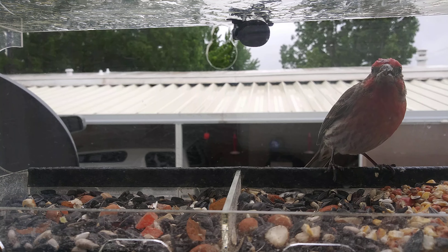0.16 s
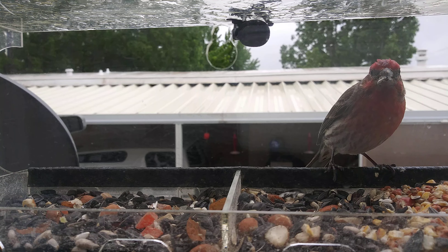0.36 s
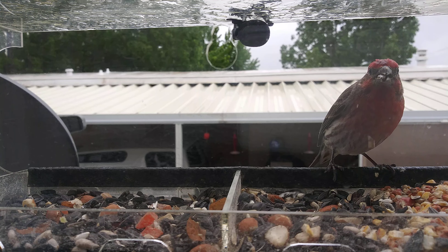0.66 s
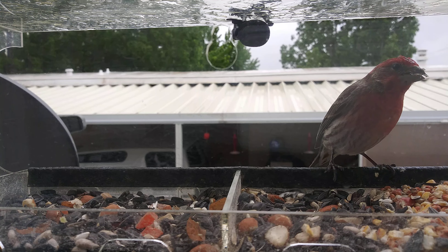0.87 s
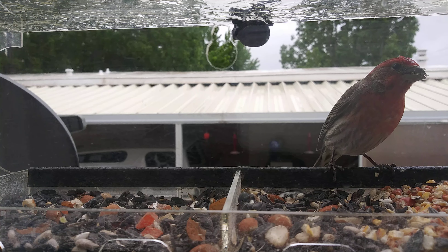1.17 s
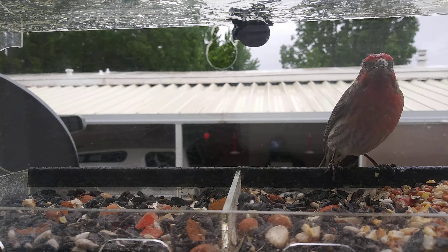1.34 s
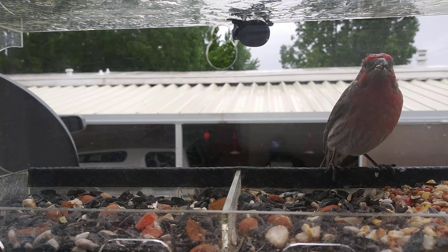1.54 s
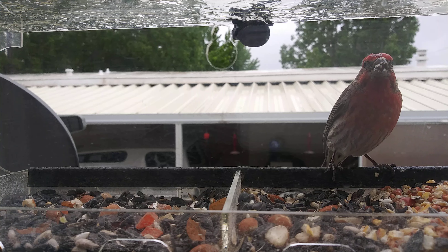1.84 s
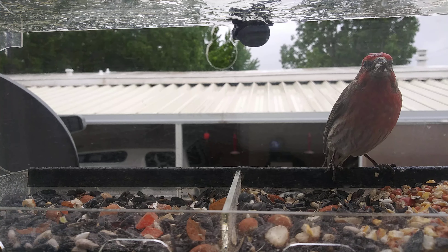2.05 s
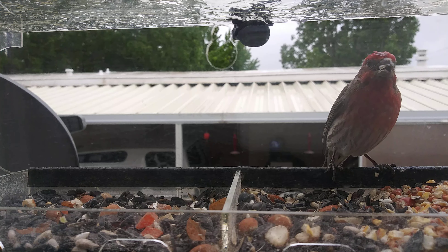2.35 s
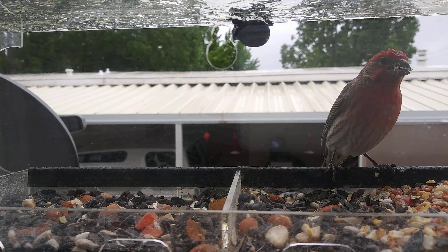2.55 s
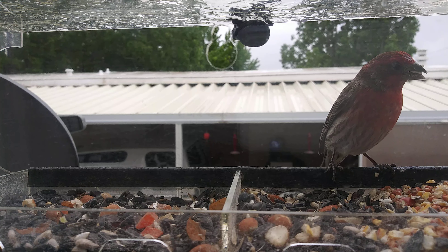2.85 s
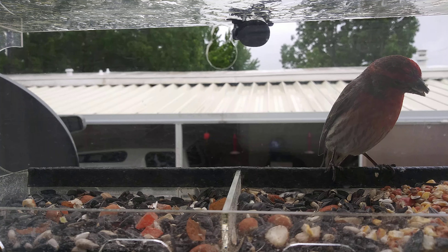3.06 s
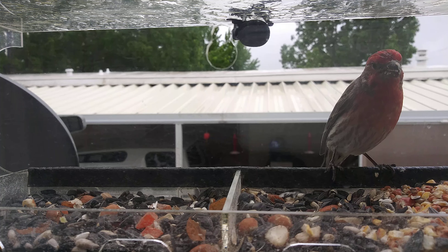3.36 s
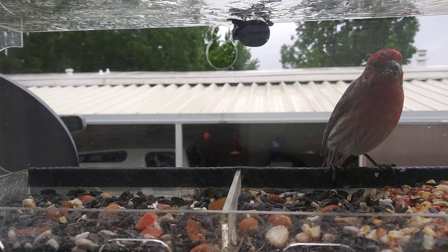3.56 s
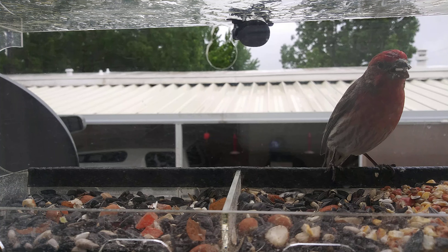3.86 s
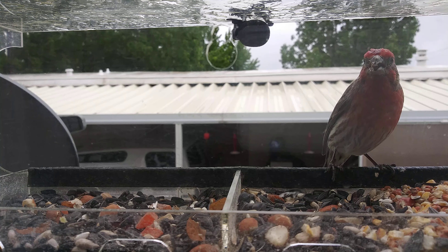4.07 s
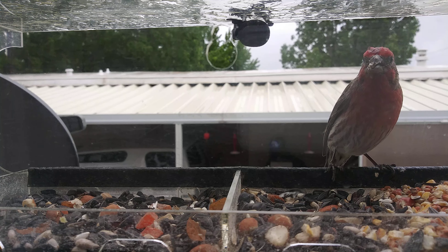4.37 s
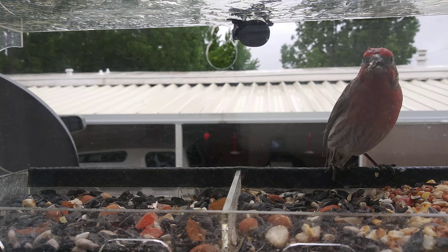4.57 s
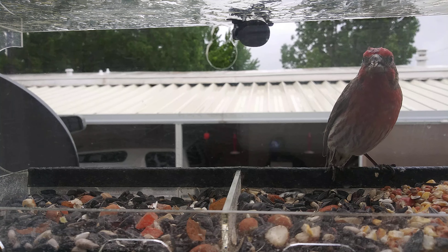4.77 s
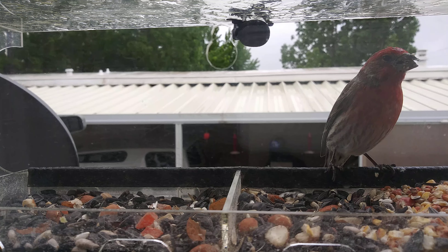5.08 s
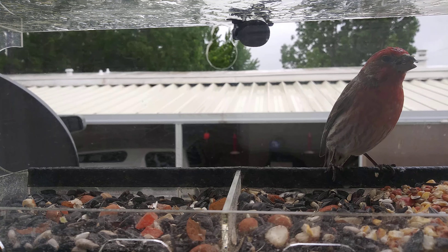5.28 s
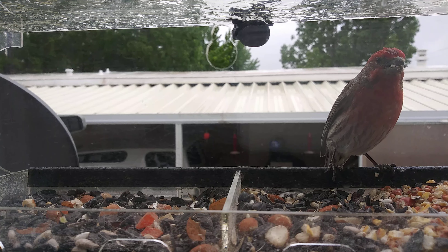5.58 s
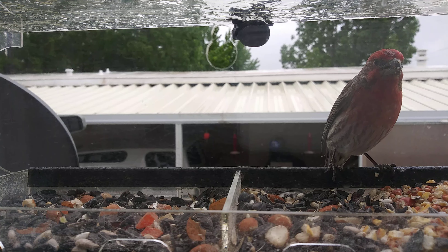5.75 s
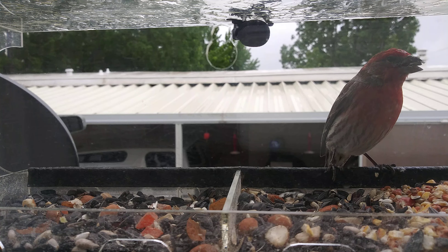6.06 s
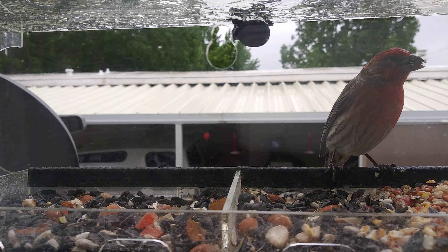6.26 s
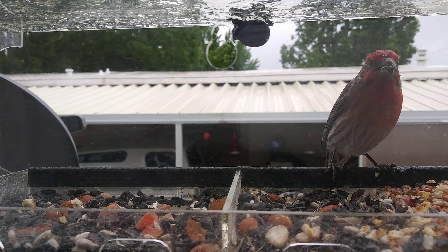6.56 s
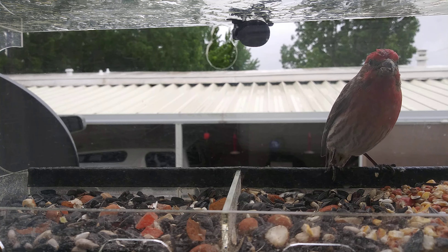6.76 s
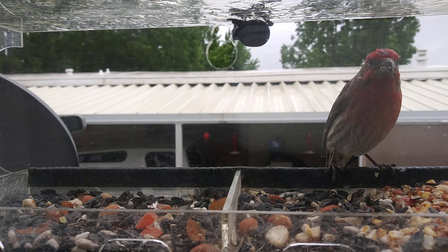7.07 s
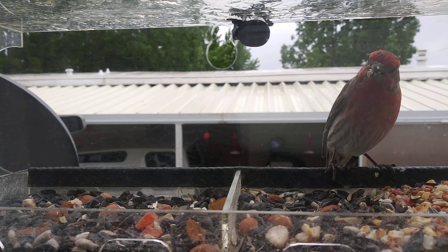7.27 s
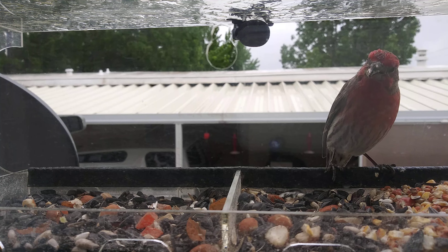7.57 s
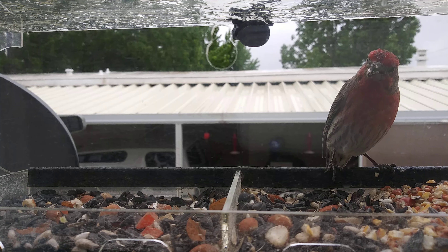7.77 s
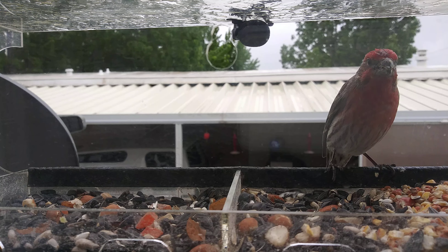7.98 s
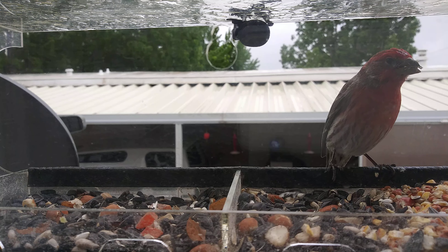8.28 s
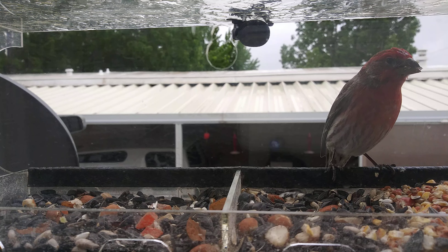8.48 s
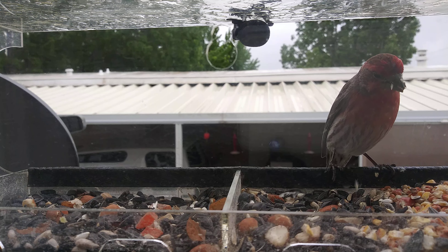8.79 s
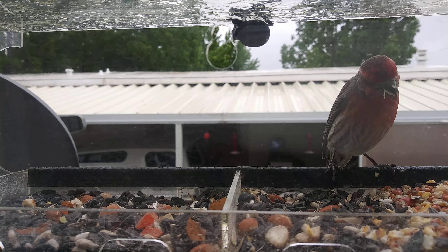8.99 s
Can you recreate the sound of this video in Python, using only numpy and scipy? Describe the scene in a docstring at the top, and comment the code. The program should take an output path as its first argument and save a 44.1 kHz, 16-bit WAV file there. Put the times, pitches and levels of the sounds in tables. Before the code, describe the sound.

Outdoors on a drizzly day, a finch husks seeds right beside a microphone in a plastic feeder. Brittle snaps of very uneven strength come irregularly, with faint crunchy ticks between. Behind, cars hum past on a far wet road, mostly in the first three seconds, water drips plink softly, and low thumps surface. A short raspy chirp falls near 3.4 seconds, another fainter near 7.3; the hardest crack comes near 8.6.

```python
"""A feeder on a drizzly day: a finch cracks and husks seeds in the plastic, right beside the feeder's camera.
Cracks are snaps of noise through ringing plastic modes; two chirps and faint whistles are gliding tones.
Far drips are decaying tones; cars on a distant wet road, soft low thumps and drizzle are shaped noise.
The camera's noise suppressor holds steady treble hiss down and lets it through briefly around each tick."""
import sys
import numpy as np
from scipy import signal
from scipy.fft import rfft, irfft, next_fast_len
from scipy.io import wavfile
from scipy.ndimage import uniform_filter1d, minimum_filter1d

SR = 44100
rng = np.random.default_rng(int(sys.argv[2]) if len(sys.argv) > 2 else 0)


def master(y):
    """Save y as 16-bit WAV."""
    cut = np.clip(np.atleast_2d(y).T, -1, 1)
    pcm = np.round(cut * 32767)  # scale
    wavfile.write(sys.argv[1], SR, pcm.astype(np.int16))


N = 402633

# Low outdoor rumble. Each row: time in seconds, level in dB before rumble_gain_db.
RUMBLE_LEVEL = [(0.0, -63), (0.64, -61), (0.99, -53.5), (2.26, -62), (4.78, -62.5), (5.08, -67),
                (5.95, -61.5), (6.53, -63.5), (6.79, -58), (7.12, -60), (7.55, -64.5), (7.93, -63.5),
                (9.13, -65.5)]
# Noise spectra. Each row: frequency in Hz, relative density in dB per Hz.
RUMBLE_SPECTRUM = [(20, -36), (45, -16), (100, -5), (180, -1), (370, -1), (480, -9.5), (720, -11),
                   (1100, -32.5), (2500, -53.5)]
DRONE_SPECTRUM = [(300, -48), (440, -12.5), (535, -5), (580, -5.5), (630, -6.5), (700, -12.5), (850, -53)]
ROAR_SPECTRUM = [(600, -48), (770, -13.5), (860, -1.5), (950, 0), (1040, -4), (1130, -13), (1450, -57.5)]
WHINE_SPECTRUM = [(950, -37), (1130, 2.5), (1230, 6.5), (1340, 6), (1490, -11), (1700, -3.5), (2050, -9),
                  (2350, -6), (2650, -11.5), (4000, -39.5)]
SPRAY_SPECTRUM = [(1200, -22.5), (1600, -6), (2300, -2), (2800, -13), (4200, -2.5), (5400, -1.5),
                  (6500, -12.5), (9000, -24)]
DRIZZLE_SPECTRUM = [(700, -28.5), (1450, -6.5), (1700, -2.5), (2100, -2.5), (2450, 6), (2800, 1),
                    (3300, -0.5), (4200, 2), (6200, -2.5), (9500, -5.5), (12500, -12), (16000, -11)]
# Cars on the far road. Each row: nearest at in seconds, half length in seconds,
# then tyre roar, engine drone, tyre whine and spray in dB before the band gains.
CAR_PASSES = [(0.165, 0.76, -42, -44.5, -45, -66), (0.8, 0.16, -59.5, -51.5, -49.5, -59),
              (1.154, 0.45, -72, -45.5, -51, -67), (1.477, 0.55, -39, -47.5, -54, -57.5),
              (2.25, 0.25, -41.5, -45.5, -57.5, -60), (2.541, 0.3, -44, -49, -54, -60.5),
              (3.184, 0.72, -51, -59, -78, -63.5), (4.395, 0.068, -57, -84.5, -75, -77),
              (7.003, 0.18, -86.5, -49, -75, -79), (8.001, 0.29, -37.5, -43.5, -55.5, -68),
              (8.907, 0.6, -46.5, -68, -61, -74.5)]
# Steady road: roar, drone, whine and spray in dB before the band gains.
STEADY_ROAD_DB = (-78, -65.5, -76.5, -91.5)
# Exponents of the fade with distance: roar, drone, whine and spray.
FADE_EXPONENTS = (3.23, 6.8, 4.1, 0.77)
# Drips that ring on gutters and pots. Each row: start in seconds, pitch in Hz, level in dB before drip_gain_db.
RINGING_DRIPS = [(.26, 503, -46), (.41, 638, -49), (.78, 656, -48), (0.889, 400, -47), (1.09, 303, -47.5),
                 (1.17, 606, -44), (1.53, 561, -42), (1.748, 350, -50.5), (1.76, 560, -46.5),
                 (2.13, 577, -46), (2.22, 571, -49), (2.48, 555, -50.5), (2.511, 373.4, -47),
                 (3.2, 603, -57), (3.519, 363, -53), (3.81, 613, -56), (3.89, 350, -55.5),
                 (4.05, 581, -49.5), (4.205, 3240, -62), (4.3, 595, -57), (5.471, 384, -54.5),
                 (5.61, 618, -56), (5.839, 357, -52), (5.85, 1320, -63), (6.1, 377, -56), (6.149, 328, -52),
                 (6.59, 1670, -59), (6.659, 1800, -59.5), (6.905, 563, -47), (6.981, 496, -51),
                 (6.993, 1673, -52.5), (7.07, 541, -46), (7.25, 527, -49.5), (7.385, 1644, -62),
                 (7.91, 547, -42), (7.99, 523, -45)]
# Usual level of the fainter drips. Each row: pitch in Hz, level in dB before scatter.
FAINT_DRIP_LEVEL = [(280, -65.5), (600, -65), (1000, -64), (1700, -64.5), (2100, -68)]
# Soft thumps. Each row: middle in seconds, half-height length in seconds, pitch in Hz,
# level in dB before thump_gain_db.
LOW_THUMPS = [(.95, 0.12, 153, -53), (1.15, 0.13, 160, -57), (1.547, 0.071, 309, -48.5),
              (1.764, 0.072, 222, -61.5), (2.035, 0.1, 201, -50.5), (4.388, 0.096, 184, -55),
              (4.639, 0.098, 180, -55), (6.61, 0.19, 110, -59.5), (6.795, 0.14, 139, -58.5),
              (7.25, 0.18, 167, -55.5)]
# Far birds. Each row: start in seconds, length in seconds, pitch in Hz, sag in Hz, level in dB.
FAR_WHISTLES = [(3.935, 0.18, 1850, 45, -57), (4.202, 0.079, 4600, 60, -65), (4.27, 0.11, 4590, 110, -70),
                (4.655, 0.14, 2819, 49.5, -59), (4.773, 0.13, 2430, 40.2, -59),
                (4.873, 0.083, 2580, 60, -57)]
# Two chirps, point by point. Each row: time in seconds, pitch in Hz, level in dB before the voice gain.
CHIRP_POINTS = [
    [(3.375, 4100, -64), (3.383, 4250, -45), (3.391, 4400, -55), (3.399, 4400, -49), (3.405, 4300, -41),
     (3.411, 4150, -34), (3.416, 4050, -37), (3.422, 3900, -29), (3.435, 3350, -33), (3.441, 3050, -47),
     (3.449, 2720, -39), (3.456, 2600, -64)],
    [(7.255, 3800, -66), (7.264, 3850, -55), (7.272, 4300, -54), (7.281, 4750, -56), (7.293, 4400, -42),
     (7.303, 4100, -47), (7.318, 3400, -44), (7.328, 2950, -51), (7.334, 2700, -70)],
]
# Voice of each chirp. Each row: gain in dB, overtone in dB, upper voice in dB, rasp depth in rad.
CHIRP_VOICES = [(-.5, -15, -10, .4), (-.5, -23, -10, .2)]
# Near walls that return the chirps. Each row: delay in seconds, level in dB.
WALL_ECHOES = [(.005, -8), (0.019, -11.5), (.037, -10)]
# Decay of the yard's echo. Each row: frequency in Hz, t60 in seconds.
YARD_T60 = [(300, 0.54), (4000, 0.33), (9000, 0.42), (16000, 0.78)]
# Modes of the plastic housing. Each row: frequency in Hz, t60 in seconds, level in dB over the direct sound.
HOUSING_MODES = [(980, .05, 1), (1670, .045, 5), (1800, .04, 1), (2035, .04, -2), (2780, .032, 8),
                 (3180, .028, 3), (4135, .02, -4), (5262, .026, 1), (5690, .022, -4), (6370, .03, 1),
                 (6700, .022, -5), (7495, .028, -7), (12720, .022, -4), (13720, .025, -5)]
# Colour shared by all cracks. Each row: frequency in Hz, level in dB.
SHELL_SPECTRUM = [(100, -51), (500, -40.5), (750, -31.5), (950, -7), (1400, -21), (1750, -6), (2450, -6.5),
                  (3300, 0), (4100, 4), (5500, -3), (7800, 1.5), (10900, 0.5), (12700, 1.5), (15200, -1),
                  (16500, -16)]
# Beak cracks. Each row: start in seconds, level in dB over 5 ms,
# then added tilt in dB at 2, 3.5 and 13 kHz against 7 kHz.
BEAK_CRACKS = [(0.049, -47.5, 3.5, 4, 7.5), (0.1215, -12.5, -4, -6, 1.5), (0.134, -46.5, -12, -9, 2.5),
               (0.3448, -46, -11.5, 0, 6.5), (0.6656, -21.5, -13, -2, -1), (0.6897, -41, 15, -2, -7),
               (0.7527, -51, 8, 7, 1.5), (0.791, -53, 1, -9, 6), (0.8093, -43, 12, 0.5, -10),
               (0.8504, -40, 23, 11.5, -1), (0.8954, -34.5, -13, -4, 4), (.899, -36.5, -14, -4, 0.5),
               (0.902, -46, -6, -4, -5), (0.954, -34, -29, -0.5, 0.5), (0.994, -48.5, -1, -14, -7.5),
               (1.036, -40.5, 12, -5.5, -10), (1.098, -55, -10, -12, -4), (1.1333, -41.5, 20, 13, -11),
               (1.234, -48, 4, 3.5, 0), (1.2996, -51.5, -1, -13, -2.5), (1.4434, -44, -10, -18, 7.5),
               (1.4513, -24, 4.5, -5.5, -11), (1.529, -42, 17, 2, 1), (1.671, -45.5, -2, -2.5, -2),
               (1.867, -23.5, -2.5, 2, -0.5), (1.943, -39, 19.5, 8, 9), (2.017, -50, -24, -6, -1),
               (2.071, -49.5, -13, -12, 0), (2.164, -47, 7, -15.5, -13), (2.3686, -46.5, 7.5, 2.5, 0),
               (2.585, -35.5, 0, -7, -0.5), (2.65, -55, -8, -13, 1), (2.7925, -42, -22, -4, -1),
               (2.829, -31.5, -28, 5.5, -10), (2.8952, -49, -2.5, -5, -10), (2.915, -44, -1, 6, -9),
               (2.9964, -41.5, -17, 11, -20), (3.0384, -32, -25, -5, 4), (3.0881, -20, -29.5, 4.5, -4.5),
               (3.096, -29, -4.5, 2, -3), (3.193, -48, -24, -2.5, -8), (3.2766, -42.5, -4, -10, 9.5),
               (3.545, -52.5, 1, -8, -19), (3.551, -44.5, 10.5, 8.5, -9.5), (3.654, -18.5, -8, 1, 2.5),
               (3.6641, -32, 1, -2, 4), (3.697, -28.5, 6.5, -0.5, 3.5), (3.836, -53.5, -7, 20, -10),
               (3.907, -48.5, 17, 8, -18), (4.0104, -45.5, -15, -10, 9.5), (4.047, -50.5, -4, -20, 6),
               (4.28, -51.5, 17.5, 4, -13), (4.3137, -52.5, -17, -24, -1), (4.3675, -50, 9.5, 4, -6),
               (4.5323, -25, 4, 4.5, -1), (4.607, -48, -4, 2, -18.5), (4.681, -39, -1, 1, -11),
               (4.833, -50.5, -1, 7.5, -21), (4.878, -54.5, 21.5, 6.5, -10), (4.9791, -45, -15.5, -12.5, 7),
               (5.0012, -50, -19, -21.5, -9.5), (5.2826, -16.5, 1, 7, -1.5), (5.3648, -44, 6.5, 1.5, -5.5),
               (5.4307, -45, 8, 1, -4), (5.6807, -17.5, 0, -1, 8.5), (5.513, -56, -5, 2, -9),
               (5.807, -51.5, -4, 7, -13), (5.9, -55, 6, 3, -22), (5.938, -50, 2, 0, -3),
               (6.02, -54.5, -3, 2, -23), (6.048, -54.5, 15, 10, -14), (6.1585, -51, -24, 2.5, -10),
               (6.2224, -49, -20, -23, -6), (6.2469, -45.5, 13, 7.5, 7), (6.305, -54, 3, 6, -5.5),
               (6.371, -48.5, -10, 1.5, 0), (6.3872, -38, -19, 10.5, 0), (6.4, -48, 9.5, -11, -4),
               (6.4417, -51.5, -9.5, -15, 5), (6.5138, -49.5, -13.5, -11.5, -5),
               (6.5252, -43.5, -18, -5.5, -6), (6.531, -78, -23.5, -6, -13), (6.5531, -43, -16.5, -8.5, -7),
               (6.592, -39, -7, 1.5, -6), (6.615, -52, 12, -5, -6), (6.726, -51, 11, 6.5, -17),
               (6.828, -51, -5, -0.5, 12.5), (6.8331, -36.5, -22.5, -7, 6.5), (6.86, -52, -13.5, -10, 23),
               (6.948, -51, 11.5, 5, -14), (7.0039, -33, 8, 2.5, -10), (7.371, -47, -13, 7, -2.5),
               (7.41, -54, 4, 6, 12.5), (7.436, -58, -6, -6, 13), (7.569, -48.5, -31, 13.5, 8),
               (7.72, -50, -9, -21, 0), (7.7528, -24.5, -8, 8.5, 0.5), (7.9441, -20, -3.5, -4, 5),
               (8.0263, -42, -19, -3, -1), (8.0897, -47, -4.5, -4, 1), (8.2652, -45.5, -15.5, -2, 0),
               (8.288, -46, -8, -5, -10.5), (8.6259, -7.5, -13, -8, -1.5), (8.7402, -43, -9.5, -0.5, -2),
               (8.7753, -29, -50, 0, 1), (8.8809, -47, 14, 9, 5.5)]
# Spells of quiet husking. Each row: start in seconds, end in seconds, tick level in dB before scatter.
HUSKING_SPELLS = [(0.709, 1.4, -61.5), (1.956, 2.207, -57), (2.402, 2.75, -57.5), (2.874, 3.3, -59.5),
                  (3.7, 4.1, -58), (4.257, 4.38, -55), (4.595, 5.034, -55.5), (5.781, 6.33, -57.5),
                  (6.387, 6.53, -55.5), (6.597, 7.15, -61), (7.389, 7.74, -54.5), (8.05, 8.398, -57.5),
                  (8.701, 8.94, -64.5)]

UPPER_RATIO = 1.08  # pitch of the second side of the bird's syrinx over the first
TOP_HZ = 16500


def amp(db):
    """Amplitude of a level in dB."""
    return 10 ** (np.asarray(db) / 20)


def unit(x):
    """x scaled to rms 1."""
    return x / np.sqrt(np.mean(x ** 2) + 1e-20)


def along(points, hz):
    """Table of (Hz, value) interpolated on a log frequency axis."""
    f, v = np.transpose(points)
    return np.interp(np.log(hz + 1), np.log(f + 1), v)


def filtered(x, response):
    """x times a response of frequency."""
    m = next_fast_len(len(x) + 8192)
    return irfft(rfft(x, m) * response(np.fft.rfftfreq(m, 1 / SR)), m)[:len(x)]


def add(track, start_s, sound):
    """Mix a sound into the track at start_s."""
    start = max(round(start_s * SR), 0)
    track[start:start + len(sound)] += sound[:max(N - start, 0)]


def rush(spectrum, patchy_db, size=2048):
    """Coloured noise of rms 1 with time-frequency patches of random gain."""
    z = signal.stft(rng.standard_normal(N), nperseg=size)[2]
    field = uniform_filter1d(rng.standard_normal(z.shape), size=5, axis=0)
    field = uniform_filter1d(field, size=3, axis=1)
    noise = signal.istft(z * amp(patchy_db * unit(field)), nperseg=size)[1][:N]
    return unit(filtered(noise, lambda hz: amp(along(spectrum, hz))))


def minimum_phase(gain):
    """The response with this gain that starts at once, with nothing before the blow."""
    cepstrum = irfft(np.log(np.maximum(gain, 1e-6)))
    half = len(cepstrum) // 2
    fold = np.r_[1, np.full(half - 1, 2), 1, np.zeros(half - 1)]
    return np.exp(rfft(cepstrum * fold))


def housing(hz):
    """Direct sound plus resonances of the plastic."""
    response = 1
    for mode_hz, t60_s, db in HOUSING_MODES:
        width_hz = np.log(1000) / np.pi / t60_s
        resonance = 1j * hz * width_hz / (mode_hz ** 2 - hz ** 2 + 1j * hz * width_hz)
        response = response + amp(db) * resonance
    return response


def yard(x, delay_s, size=256):
    """Diffuse echo: decaying noise whose t60 varies with frequency."""
    hz, t, z = signal.stft(rng.standard_normal(SR // 2), SR, nperseg=size)
    decay = amp(-60 * t / along(YARD_T60, hz)[:, None])
    tail = signal.istft(z * decay, SR, nperseg=size)[1]
    delayed = np.pad(x, (int(delay_s * SR), 0))
    return signal.fftconvolve(delayed, tail / np.linalg.norm(tail))[:N]


def traffic(rumble_gain_db=2, drone_gain_db=-2, spray_gain_db=-3, whine_gain_db=1):
    """Far cars swell and fade with distance in three bands plus housing-rung spray, over a low rumble."""
    t = np.arange(N) / SR
    power = amp(STEADY_ROAD_DB)[:, None] ** 2
    exponents = np.array(FADE_EXPONENTS)[:, None]
    for nearest_s, half_length_s, *band_db in CAR_PASSES:
        nearness = 1 / (1 + ((t - nearest_s) / half_length_s) ** 2)
        power = power + amp(band_db)[:, None] ** 2 * nearness ** exponents
    roar, drone, whine, spray = np.sqrt(power)
    rumble_db = np.interp(t, *np.transpose(RUMBLE_LEVEL))
    spray_noise = unit(filtered(rush(SPRAY_SPECTRUM, patchy_db=6, size=1024), housing))
    return (amp(drone_gain_db) * drone * rush(DRONE_SPECTRUM, patchy_db=6)
            + roar * rush(ROAR_SPECTRUM, patchy_db=3)
            + amp(whine_gain_db) * whine * rush(WHINE_SPECTRUM, patchy_db=6)
            + amp(spray_gain_db) * spray * spray_noise
            + amp(rumble_db + rumble_gain_db) * rush(RUMBLE_SPECTRUM, patchy_db=4.5))


def drizzle(hiss_db=-59, grain_db=2, grain_s=0.004):
    """Fine rain hisses on roofs and leaves, grainy with droplets, and rings in the housing."""
    flicker = uniform_filter1d(rng.standard_normal(N), size=max(int(grain_s * SR), 1))
    grains = amp(grain_db * unit(flicker))
    return amp(hiss_db) * unit(filtered(grains * rush(DRIZZLE_SPECTRUM, patchy_db=2.5), housing))


def patter(patter_db=-65, drops_per_s=90, spread_db=5):
    """Single droplets of very unequal size tick on the leaves and the feeder's lid."""
    place, draw = rng.random((2, int(drops_per_s * N / SR)))
    strength = -spread_db * np.log(0.03 + draw)  # many weak, few strong
    drops = np.bincount((place * N).astype(int), amp(strength), N)
    return amp(patter_db) * unit(filtered(drops, lambda hz: amp(along(DRIZZLE_SPECTRUM, hz)) * housing(hz)))


def plink(pitch_hz, db, t60_s=0.13, swell_s=0.0026, waver_rad=0.29):
    """Soft-edged decaying tone whose phase wanders a little."""
    t = np.arange(SR // 4) / SR
    drift = np.interp(t, np.linspace(0, t[-1], num=26), rng.standard_normal(26))
    envelope = amp(db - 60 * t / t60_s) * (1 - np.exp(-t / swell_s))
    return 2 * envelope * np.sin(2 * np.pi * pitch_hz * t + waver_rad * drift)


def drips(drip_gain_db=3, faint_per_s=23, low_hz=280, high_hz=2100):
    """Water drips all round the yard, each drop ringing at its own pitch."""
    out = np.zeros(N)
    for start_s, pitch_hz, db in RINGING_DRIPS:
        add(out, start_s, plink(pitch_hz, db + drip_gain_db))
    for place, height, strength in rng.random((int(faint_per_s * N / SR), 3)):
        pitch_hz = low_hz * (high_hz / low_hz) ** height
        db = along(FAINT_DRIP_LEVEL, pitch_hz) + 10 * (strength - 0.5)
        add(out, place * N / SR, plink(pitch_hz, db))
    return out


def thumps(width_hz=45, thump_gain_db=1):
    """Soft swells of narrow low noise."""
    out = np.zeros(N)
    for middle_s, length_s, pitch_hz, db in LOW_THUMPS:
        swell = np.hanning(int(2 * length_s * SR))
        noise = rng.standard_normal(len(swell))
        boom = filtered(noise, lambda hz: 1 / (1 + ((hz - pitch_hz) / width_hz) ** 4))
        add(out, middle_s - len(swell) / SR / 2, amp(db + thump_gain_db) * unit(boom * swell))
    return out


def whistles(attack_s=0.012, release_s=0.075, waver_rad=0.77, waver_hz=40):
    """Held notes from far birds: sines that sag a little in pitch and waver in phase."""
    out = np.zeros(N)
    for start_s, length_s, pitch_hz, sag_hz, db in FAR_WHISTLES:
        t = np.arange(int(length_s * SR)) / SR
        envelope = np.minimum(t / attack_s, 1) * np.minimum((length_s - t) / release_s, 1)
        drift = unit(filtered(rng.standard_normal(len(t)), lambda hz: 1 / (1 + (hz / waver_hz) ** 4)))
        glide_hz = pitch_hz - sag_hz * t / length_s
        phase = 2 * np.pi * np.cumsum(glide_hz) / SR + waver_rad * drift
        add(out, start_s, np.sqrt(2) * amp(db) * envelope * np.sin(phase))
    return out


def chirps(rasp_hz=800):
    """A raspy two-voiced whistle rises, then slurs down; the near walls' copies beat against it."""
    song = np.zeros(N)
    for points, (gain_db, overtone_db, upper_db, rasp_rad) in zip(CHIRP_POINTS, CHIRP_VOICES):
        s, pitch_hz, level_db = np.transpose(points)
        t = np.arange(s[0], s[-1], 1 / SR)
        flutter = unit(filtered(rng.standard_normal(len(t)), lambda hz: 1 / (1 + (hz / rasp_hz) ** 8)))
        loudness = amp(gain_db + np.interp(t, s, level_db))
        glide_hz = np.interp(t, s, pitch_hz)
        height = (glide_hz - pitch_hz.min()) / np.ptp(pitch_hz)
        rasp = rasp_rad * height * np.sqrt(loudness / loudness.max())  # loud and high is roughest
        phase = 2 * np.pi * np.cumsum(glide_hz) / SR + rasp * flutter
        upper = amp(upper_db) * height * np.sin(UPPER_RATIO * phase)
        overtone = amp(overtone_db) * np.sin(2 * UPPER_RATIO * phase)
        note = np.sqrt(2) * loudness * (np.sin(phase) + upper + overtone)
        add(song, s[0], note)
        for delay_s, wall_db in WALL_ECHOES:
            add(song, s[0] + delay_s, amp(wall_db) * note)
    return song


def crack(db, knock_db, body_db, edge_db, snap_t60_s=0.0011, ring_t60_s=0.016, ring_db=-20, rise_s=0.00023):
    """A husk snaps in about a millisecond, over all frequencies, and the plastic rings briefly."""
    t = np.arange(2 * (SR // 40)) / SR
    hz = np.fft.rfftfreq(len(t), 1 / SR)
    decay = amp(-60 * t / snap_t60_s) + amp(ring_db - 60 * t / ring_t60_s)
    envelope = (1 - np.exp(-t / rise_s)) * decay
    burst = rfft(envelope * rng.standard_normal(len(t)))
    even = 1 / np.sqrt(uniform_filter1d(abs(burst) ** 2, size=75))  # even strength across the spectrum
    tilt = [(1100, -6), (1800, knock_db), (2000, knock_db), (3000, body_db), (4500, body_db),
            (5800, 0), (9300, 0), (11800, edge_db)]
    colour = minimum_phase(even * amp(along(SHELL_SPECTRUM, hz) + along(tilt, hz))) * housing(hz)
    snap = unit(irfft(burst * colour, len(t)))
    return amp(db) * snap / np.sqrt(10)  # from 50 ms to the 5 ms level scale


def finch(ticks_per_s=28, scatter_db=11, knock_db=-3, body_db=2, edge_db=-7, colour_scatter_db=14):
    """The beak cracks the seed; between cracks faint ticks come at uneven gaps as the beak rolls it."""
    beak = np.zeros(N)
    for start_s, db, *tilt_db in BEAK_CRACKS:
        add(beak, start_s, crack(db, *tilt_db))
    for spell_start_s, spell_end_s, db in HUSKING_SPELLS:
        for slot_s in np.arange(spell_start_s, spell_end_s, 1 / ticks_per_s):
            tick_s = slot_s + rng.random() / ticks_per_s
            strength, body, edge = rng.random(3) - 0.5
            tick = crack(db + scatter_db * strength, knock_db,
                         body_db + colour_scatter_db * body, edge_db + colour_scatter_db * edge)
            add(beak, tick_s, tick)
    return beak


def scene():
    """The finch is close and dry, the chirping bird stands out in the yard."""
    background = traffic() + drizzle() + patter() + drips() + thumps() + whistles()
    song, beak = chirps(), finch()
    echoes = amp(-4.5) * yard(song, delay_s=0.017) + amp(-35.5) * yard(beak, delay_s=0.019)
    return background + song + beak + echoes


def suppressor(x, release_db_per_s=200, knee_db=4, size=512, count=36):
    """Treble bands open when they rise above their usual level of the second around, then close steadily."""
    overlap = size * 3 // 4
    hz, t, z = signal.stft(x, SR, nperseg=size, noverlap=overlap)
    power = abs(z) ** 2
    centres_s = np.linspace(0, t[-1], count)
    usual = np.transpose([np.median(power[:, abs(t - s) < 0.5], axis=1) for s in centres_s])
    usual = usual[:, np.rint(t / t[-1] * (count - 1)).astype(int)]
    ratio = power / (usual / np.log(2) + 1e-20)  # log 2 turns a noise median into its mean
    ratio = uniform_filter1d(uniform_filter1d(ratio, size=5, axis=0), size=5, axis=1)
    excess_db = 10 * np.log10(np.maximum(ratio - 2.9, 1e-6))
    ramp_db = release_db_per_s * t
    held_db = np.maximum.accumulate(excess_db + ramp_db, axis=1) - ramp_db
    gain = 1 / np.sqrt(1 + amp(knee_db - held_db) ** 2)
    floor_db = [(1350, 0), (1550, -7), (2300, -12), (3400, -22), (5500, -23), (8000, -30)]
    deepest = amp(along(floor_db, hz))
    return signal.istft(z * np.maximum(gain, deepest[:, None]), SR, nperseg=size, noverlap=overlap)[1][:N]


def record(dry, size=12, bass_hz=52):
    """The camera suppresses steady hiss, limits the hardest cracks and cuts the deep bass and the top."""
    quiet = suppressor(dry)
    limit = minimum_filter1d(1 / np.maximum(abs(quiet), 1), size=size)
    gain = uniform_filter1d(limit, size=size)
    return filtered(quiet * gain, lambda hz: hz ** 2 / (hz ** 2 + bass_hz ** 2) / (1 + (hz / TOP_HZ) ** 80))


dry = scene()
out = record(dry)
master(out)
```